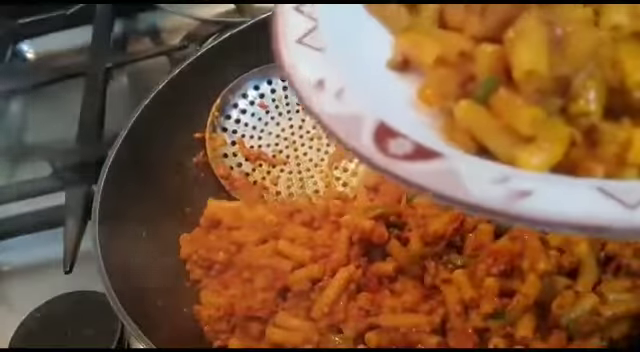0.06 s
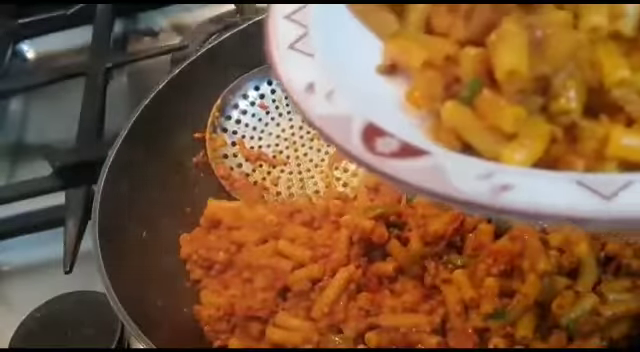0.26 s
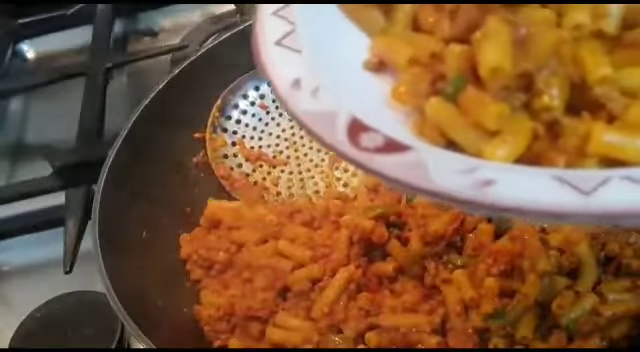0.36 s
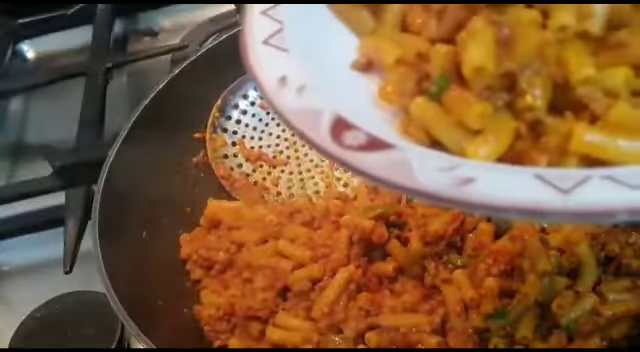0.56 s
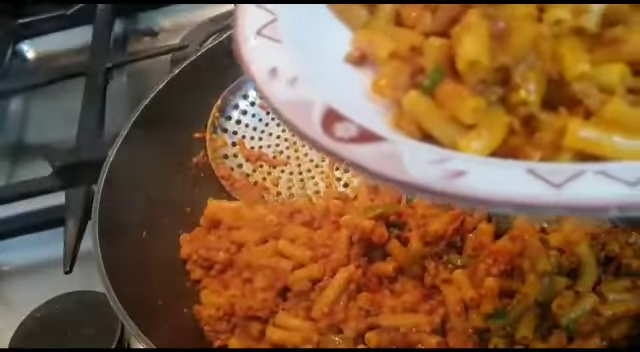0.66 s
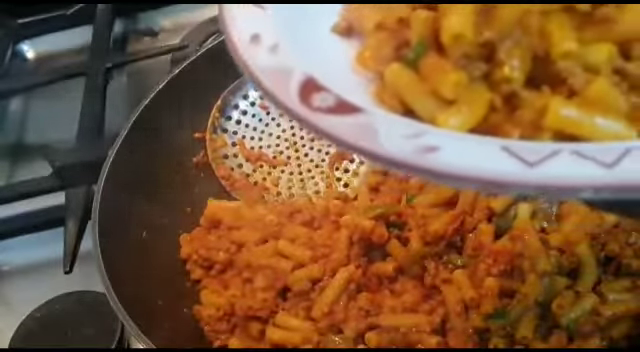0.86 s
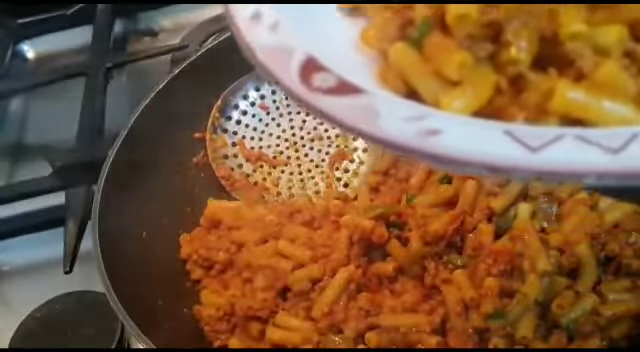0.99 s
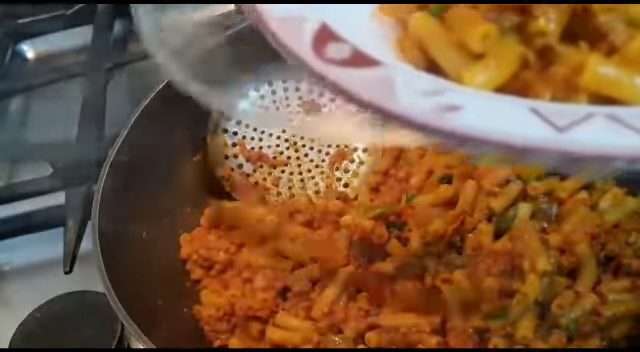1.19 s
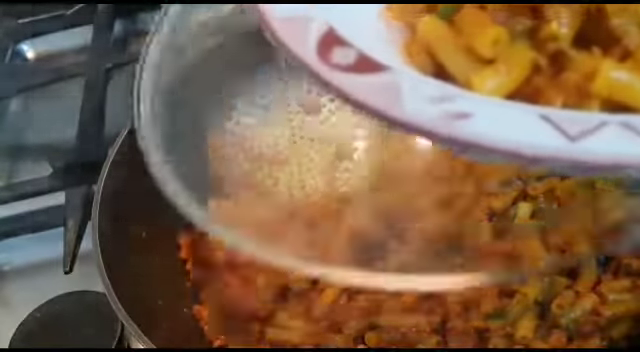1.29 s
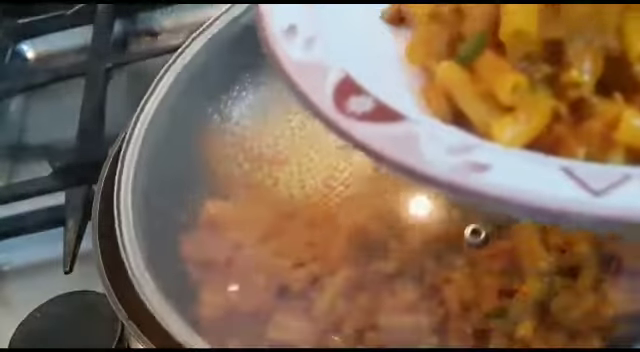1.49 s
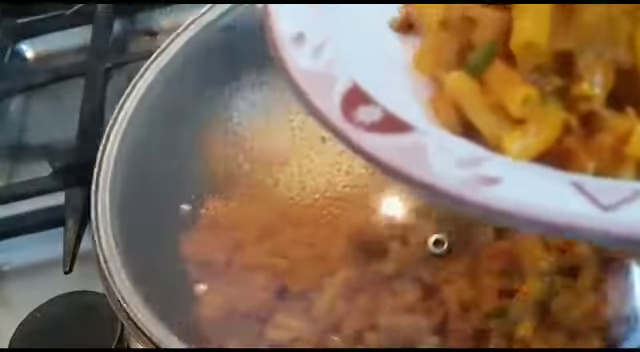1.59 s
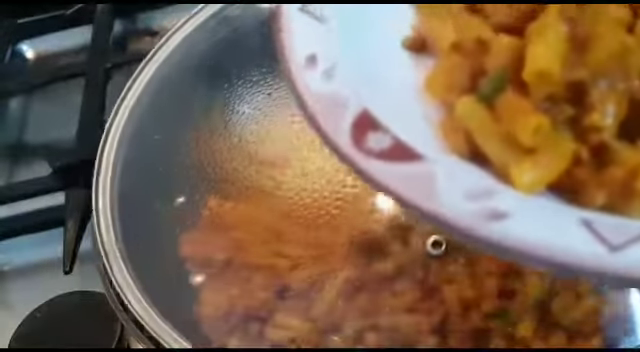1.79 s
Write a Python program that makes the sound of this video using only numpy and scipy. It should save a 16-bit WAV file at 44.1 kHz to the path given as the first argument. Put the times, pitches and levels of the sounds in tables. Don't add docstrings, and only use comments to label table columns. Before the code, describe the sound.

Glass pan lid clanks sharply off metal, then lands rattling on a pan of softly ticking food

```python
import sys
import numpy as np
from scipy import signal
from scipy.fft import rfft, irfft
from scipy.io import wavfile
from scipy.ndimage import uniform_filter1d, map_coordinates

SR = 44100
rng = np.random.default_rng(int(sys.argv[2]) if len(sys.argv) > 2 else 0)


def dump(signal):
    limited = np.clip(np.atleast_2d(signal).T, -1, 1)
    pcm = np.round(limited * 32767).astype(np.int16)
    wavfile.write(sys.argv[1], SR, pcm)


def rack_gain(trim_db):
    fader = np.asarray(trim_db, float)
    return 10 ** (fader / 20)


N = 81585
T = np.arange(N) / SR

# pitch_hz, level_db (per Hz)
PAN_CRACK = [(530, 11.5), (900, 5), (1590, -1.5), (2300, 1.5), (3500, -2.5), (6420, 1), (7800, -7),
             (9500, -23), (15500, -25)]
# pitch_hz, level_db (per Hz)
LIFT_CRACK = [(530, -11), (900, 0), (1500, -11), (3950, -8), (4600, -13.5), (6800, -6.5), (10500, -31.5),
              (14300, -16), (15500, -30.5)]


def unit(x):
    return x / np.sqrt(np.mean(x ** 2))


def curve(rows):
    return rack_gain(np.interp(T, *np.array(rows).T[:2]))


def colour(x, shape):
    hz = np.fft.rfftfreq(len(x), 1 / SR)
    points = np.array(shape)
    gain = rack_gain(np.interp(np.log(hz + 1), np.log(points[:, 0]), points[:, 1]))
    return irfft(rfft(x) * gain / np.sqrt(np.mean(gain ** 2)), len(x))


def band(x, hz, width_hz):
    return signal.lfilter(*signal.iirpeak(min(hz, 20000), hz / width_hz, SR), x)


def noise():
    return rng.standard_normal(N)


def walk(rate_hz):
    k = int(SR / rate_hz)
    return unit(uniform_filter1d(uniform_filter1d(noise(), k), k))


def kitchen():
    # pitch_hz, level_db (per Hz)
    rumble = [(25, -39), (60, 4), (110, -7), (250, -13), (500, -17), (1200, -30), (3000, -48),
              (15500, -45.5)]
    # pitch_hz, level_db
    hum = [(60, -72.5), (122, -66.5), (181, -77.5)]
    # start_s, level_db, pitch_hz, fade_s
    thumps = [(1.7, -42.5, 68, 0.025), (.295, -39.5, 70, 0.023), (1.4, -46.5, 95, 0.035),
              (1.68, -51, 70, 0.024), (1.2, -49, 120, 0.035)]
    # start_s, level_db, pitch_hz, fade_s
    bumps = [(.853, -46, 165, .005), (.107, -52, 445, .006)]
    out = rack_gain(-56.5 + walk(6)) * colour(noise(), rumble)
    for hz, db in hum:
        out = out + rack_gain(db + 1.9 * walk(8.9)) * np.sqrt(2) * np.sin(2 * np.pi * hz * T)
    for start_s, db, hz, fade_s in thumps + bumps:
        t = np.maximum(T - start_s, 0)
        fade = np.exp(-t / fade_s)
        out = out + rack_gain(db) * np.sin(2 * np.pi * hz * t) * 4 * fade * (1 - fade)
    return out


def hiss():
    # time_s, level_db
    hiss_level = [(0, -71.5), (.05, -71), (.07, -59), (.45, -60), (.5, -62), (.56, -70.5), (.6, -92),
                  (.62, -70.5), (.73, -68.5), (.76, -57), (.88, -66), (.96, -65), (1.19, -59.5), (1.28, -78.5),
                  (1.33, -66.5), (1.38, -79.5), (1.72, -64.5), (1.85, -53)]
    # pitch_hz, level_db
    steam_colour = [(500, -15), (900, 8), (2000, 4), (3400, -1), (4300, 9), (5500, 10), (7500, 2),
                    (10000, 2.5), (15500, -13)]
    flicker_db = 1.2
    grain = colour(noise() * rack_gain(2 * rng.exponential(size=N)), steam_colour)
    air = band(grain, 12000, 5400) * (rack_gain(2 * flicker_db * walk(8.2)) - 1)
    return unit(grain * rack_gain(flicker_db * walk(25)) + air) * curve(hiss_level)


def ticks():
    # start_s, level_db (peak)
    food_ticks = [(0.0124, -61), (0.088, -43), (0.099, -44), (0.13, -38), (0.156, -43), (0.1705, -40),
                  (0.2014, -53), (0.2087, -46), (0.238, -47), (0.3844, -39.5), (0.4212, -38), (0.4343, -42),
                  (0.4464, -33.5), (0.4608, -44), (0.4755, -42), (0.495, -46), (0.5136, -52), (0.5267, -48),
                  (0.5419, -48), (0.561, -69), (0.611, -58), (0.63, -52.5), (0.6715, -47.5), (0.682, -60),
                  (0.7595, -33.5), (0.7964, -44), (0.9174, -69), (0.929, -46),
                  (.841, -50), (.949, -54), (1.059, -48), (1.158, -48), (1.196, -50), (1.238, -50),
                  (1.274, -60), (1.322, -58), (1.339, -56), (1.566, -48), (1.577, -46), (1.734, -49),
                  (1.803, -46)]
    n = 400
    out = np.zeros(N + n)
    for start_s, db in food_ticks:
        burst = rng.standard_normal(n) * np.exp(-T[:n] / 0.0005)
        hz = 9300 * np.exp(0.031 * rng.standard_normal())
        bright = unit(band(burst, hz, hz / 2))
        broad = unit(band(band(burst, 5500, 9000), 6100, 13200))
        pop = signal.lfilter(*signal.butter(2, 14500, fs=SR), bright + rack_gain(-5) * broad)
        i = int(start_s * SR)
        out[i:i + n] += rack_gain(db + 2.5) * pop / np.abs(pop).max()
    return out[:N]


def room(x):
    t = T[:30000]
    echoes = 0
    for kind, t60_s, db in (("low", .33, -10.5), ("high", .36, -4.5)):
        tail = rng.standard_normal(len(t)) * rack_gain(-60 * t / t60_s) * np.clip(t / 0.013, 0, 1)
        tail = tail / np.sqrt(np.sum(tail ** 2))
        split = signal.butter(2, 1500, kind, fs=SR, output="sos")
        echoes = echoes + rack_gain(db) * signal.sosfilt(split, tail)
    echoes = signal.lfilter(*signal.butter(1, 8550, fs=SR), echoes)
    wet = signal.fftconvolve(x, echoes)[:N]
    sway_s = .00028 * walk(25)
    return map_coordinates(wet, [(T + sway_s) * SR], mode="mirror")


def slide():
    start_s, rise_s = 1.72, 0.1
    swell = np.clip((T - start_s) / rise_s, 0, 1) ** 2 * rack_gain(1.5 * walk(61))
    low = unit(band(band(noise(), 360, 180), 220, 360))
    grit = rack_gain(1) * colour(noise(), PAN_CRACK)
    return rack_gain(-50.5) * swell * (low + grit)


def rub():
    # time_s, level_db
    strength = [(.11, -60.5), (.185, -51), (.197, -35.5), (.243, -28.5), (.27, -19.5), (.292, -34.5),
                (.306, -29.5), (.324, -24.5), (.345, -64)]
    sing_hz, sing_start_s, sing_rise_s = 611, 0.171, .01
    wobbly_hz = sing_hz * (1 + .008 * walk(35))
    tone = np.sqrt(2) * np.sin(2 * np.pi * np.cumsum(wobbly_hz) / SR) * rack_gain(2.2 * walk(73))
    tone = tone + rack_gain(-10) * unit(band(band(noise(), sing_hz, 290), sing_hz, 290))
    sings = np.clip((T - sing_start_s) / sing_rise_s, 0, 1)
    rough = unit(band(noise(), 300, 220)) * (1 - sings * (1 - rack_gain(-11.5)))
    grit = rack_gain(-18.5) * sings * colour(noise() ** 3 / 4, LIFT_CRACK)
    touching = np.clip((T - .08) * 30, 0, 1) * (T < .35)
    return curve(strength) * touching * (tone * sings + rough + grit)


def ring(modes, luck, count, tilt_db=0):
    hz, db, t60_s = np.array(modes).T
    t, luck = T[:count, None], luck[:len(modes)]
    signs = (-1.) ** np.arange(len(hz))[::-1]
    size = rack_gain(db + 2 * luck + tilt_db * np.log2(hz / 460)) * signs
    t60_s = np.where(hz > 880, np.minimum(t60_s, .07), t60_s)
    note = np.sin(2 * np.pi * hz * (1 + .012 * luck[::-1]) * t)
    return (size * note * rack_gain(-60 * t / t60_s)).sum(axis=1)


def clatter(hits, body, seat, clink, crack, crack_db, shimmer_db, shimmer_t60_s, cut_hz):
    n, chatter_s, push_s, snap_s = 16000, 0.0075, 0.00013, 0.0011
    out, t = np.zeros(N + 40000), T[:n]
    push = np.exp(-.5 * ((T[:200] - T[100]) / push_s) ** 2)
    push = push / push.sum()
    low_cut = signal.butter(2, cut_hz, "high", fs=SR, output="sos")
    for start_s, body_db, clink_db, seat_hz, *tilt in hits:
        luck = rng.standard_normal(28)
        low = ring(body + [(seat_hz, *seat)], luck, count=n, tilt_db=sum(tilt))
        low = signal.sosfilt(low_cut, rack_gain(body_db) * np.convolve(low, push)[:n])
        chatter = rng.standard_normal(2000) ** 3 * np.exp(-T[:2000] / chatter_s)
        chatter = chatter / np.sqrt(np.sum(chatter ** 2))
        high = signal.fftconvolve(ring(clink, luck[14:], count=n), chatter)[:n]
        fade = rack_gain(crack_db) * (np.exp(-t / chatter_s) + rack_gain(5) * np.exp(-t / snap_s)) / 2
        fade = fade + rack_gain(shimmer_db - 60 * t / shimmer_t60_s)
        sharp = colour(rng.standard_normal(n), crack) * fade * np.minimum(t * 2000, 1)
        i = int(start_s * SR)
        out[i - 100:i - 100 + n] += low
        out[i:i + n] += rack_gain(clink_db) * (high + sharp)
    return out[:N] * rack_gain(.9 * walk(120))


def lift_lid():
    # start_s, body_level_db, clink_level_db, seat_pitch_hz
    lift_hits = [(.107, -68.5, -69, 434), (.2495, -32, -37.5, 595), (.2525, -10.5, -29, 602),
                 (.2565, -16, -27, 620), (.260, -16.5, -27.5, 745), (.267, -23.5, -32, 690),
                 (.274, -28.5, -45.5, 616), (.279, -18.5, -42, 634), (.299, -30, -43, 680),
                 (.304, -20, -51.5, 640), (.311, -27.5, -50, 590), (.322, -30.5, -48, 563),
                 (.365, -29.5, -67, 650), (.384, -35, -63.5, 620), (.433, -53, -78, 595)]
    # pitch_hz, level_db, t60_s
    lift_body = [(169, -9, 0.042), (322.6, -16, 0.076), (406, -19.5, 0.099), (489, -15, 0.18),
                 (608, -7, 0.03), (715, -6, 0.08), (764, -7, 0.089), (803.5, -7, 0.089), (880, -14.5, 0.14),
                 (1055, -13, 0.1), (1151, -11.5, 0.081), (1267, -19, 0.11)]
    # pitch_hz, level_db, t60_s
    lift_clink = [(2020, -9.5, 0.087), (2150, -7.5, 0.026), (2194, -15, 0.07), (3400, -33, 0.022),
                  (3885, -7, 0.028), (4000, -7, 0.09), (3980, -5, 0.077), (5140, -12, 0.079),
                  (5830, -7, 0.04), (6860, -9.5, 0.089), (7050, -10, 0.08), (7770, -17.5, 0.046)]
    seat = (0, 0.024)  # level_db, t60_s
    return clatter(lift_hits, lift_body, seat, lift_clink, LIFT_CRACK, crack_db=5,
                   shimmer_db=-11.5, shimmer_t60_s=0.19, cut_hz=158)


def drop_lid():
    # start_s, body_level_db, clink_level_db, seat_pitch_hz, tilt_db (per octave)
    drop_hits = [(1.449, -24, -36, 433, -6.5), (1.479, -40, -40.5, 447, -12), (1.518, -47, -49, 400, 13),
                 (1.532, -27.5, -44.5, 486, 3.5), (1.539, -30.5, -45, 459, 7), (1.578, -45, -50, 456, 19),
                 (1.589, -40.5, -35, 470, 4), (1.592, -33, -46, 381, -9.5), (1.600, -37.5, -46, 487, 14),
                 (1.609, -30.5, -39, 438, -3.5), (1.622, -38, -57, 474, 12.5), (1.636, -41, -55, 427, -8),
                 (1.667, -34.5, -45.5, 510, -5), (1.679, -41.5, -72, 457, 3), (1.697, -48, -79, 360, 2),
                 (1.828, -75, -74, 340, 2)]
    # pitch_hz, level_db, t60_s
    drop_body = [(131, -39, 0.16), (243.5, -16, 0.14), (301.4, -16, 0.136), (357, -12, 0.13),
                 (525, -7, 0.14), (648, -18, 0.3), (793, -7, 0.12), (854, -12, 0.091), (1015, -18, 0.1),
                 (1151, -19, 0.17), (1270, -20, 0.13)]
    # pitch_hz, level_db, t60_s
    drop_clink = [(1739, -6, 0.11), (1970, -7.5, 0.096), (2430, -24.5, 0.056), (2426, -7, 0.078),
                  (3040, -8.5, 0.094), (3650, -13.5, 0.057), (4120, -9, 0.074), (4750, -21, 0.028),
                  (6430, -9, 0.032), (7550, -5, 0.018)]
    seat = (4.4, 0.094)  # level_db, t60_s
    return clatter(drop_hits, drop_body, seat, drop_clink, PAN_CRACK, crack_db=6.5,
                   shimmer_db=-1.5, shimmer_t60_s=0.068, cut_hz=81)


def scene():
    lid = lift_lid() + drop_lid() + rub() + slide()
    pops = ticks()
    echoes = room(lid + 0.37 * pops)
    return (lid + echoes + pops + hiss() + kitchen())[None]


def low_pass(x):
    return signal.sosfilt(signal.butter(12, 16310, fs=SR, output="sos"), x)


def record(dry):
    low_cut = signal.butter(4, 55, "high", fs=SR, output="sos")
    top_cut = signal.ellip(8, .2, 70, 15450, fs=SR, output="sos")
    mix = signal.sosfilt(top_cut, signal.sosfilt(low_cut, dry))
    return low_pass(mix)


dry = scene()
out = record(dry)
dump(out)
```